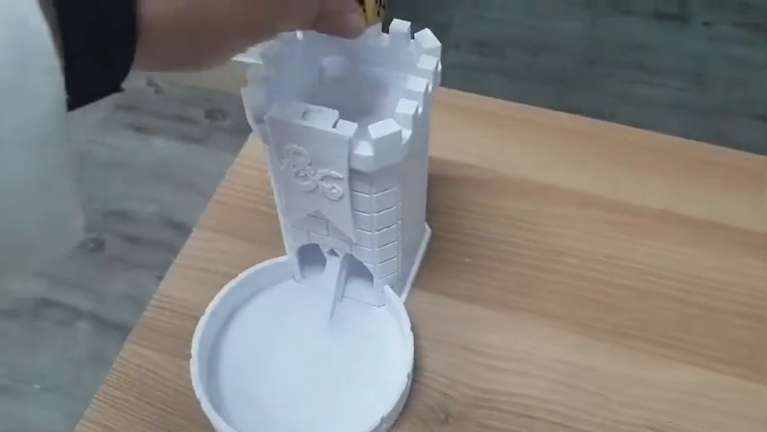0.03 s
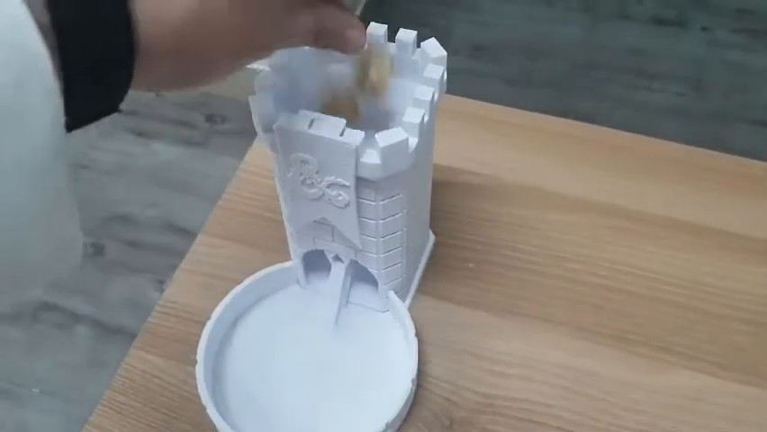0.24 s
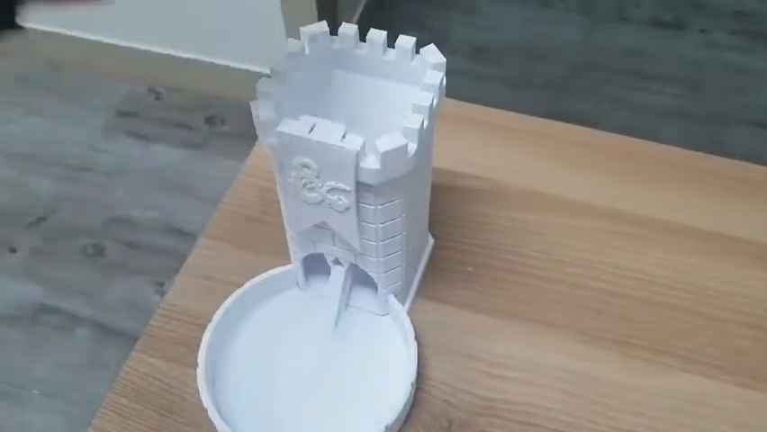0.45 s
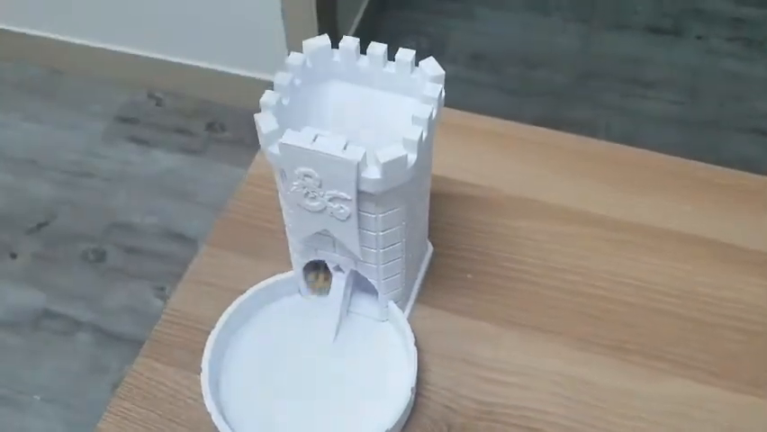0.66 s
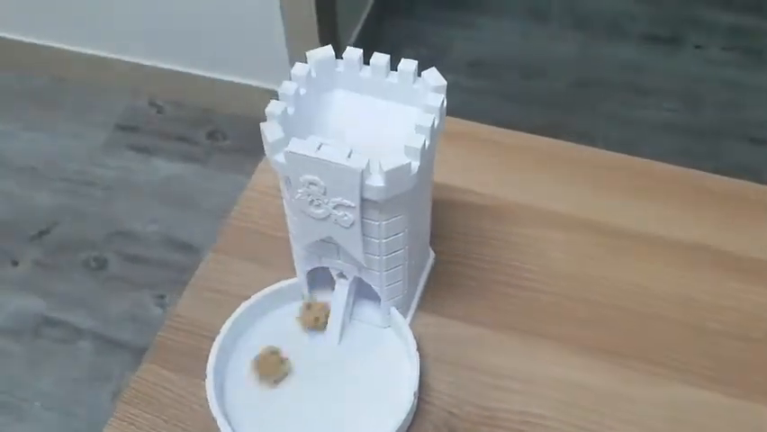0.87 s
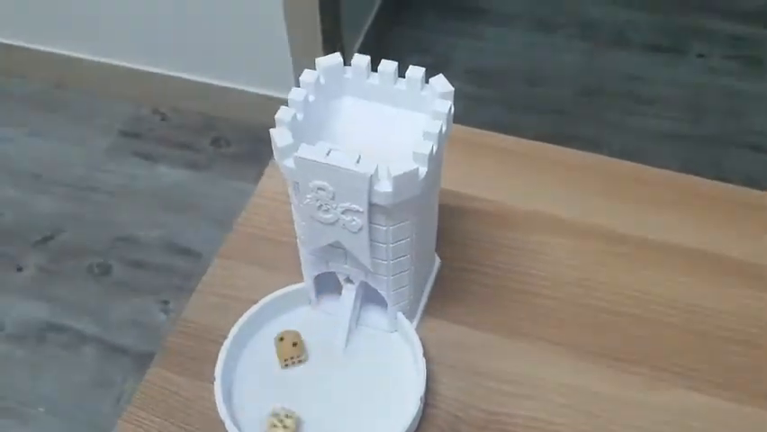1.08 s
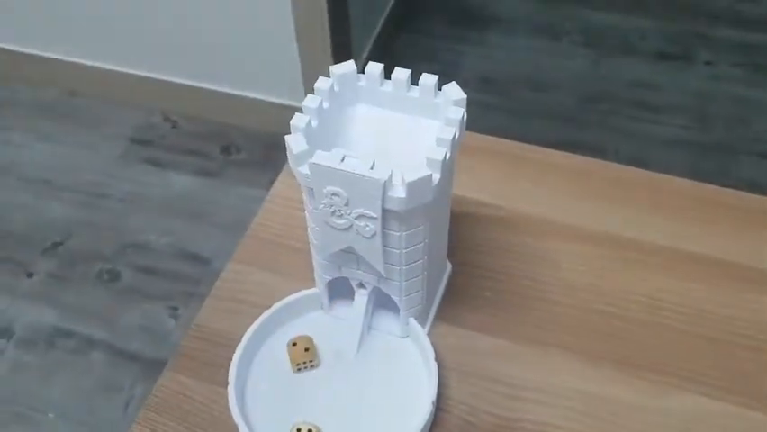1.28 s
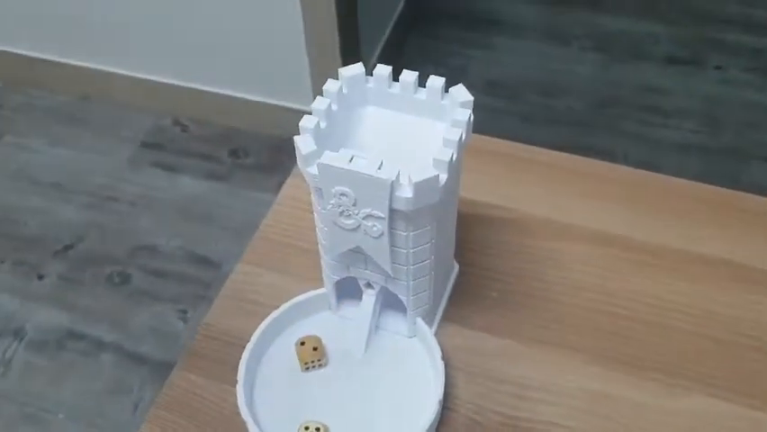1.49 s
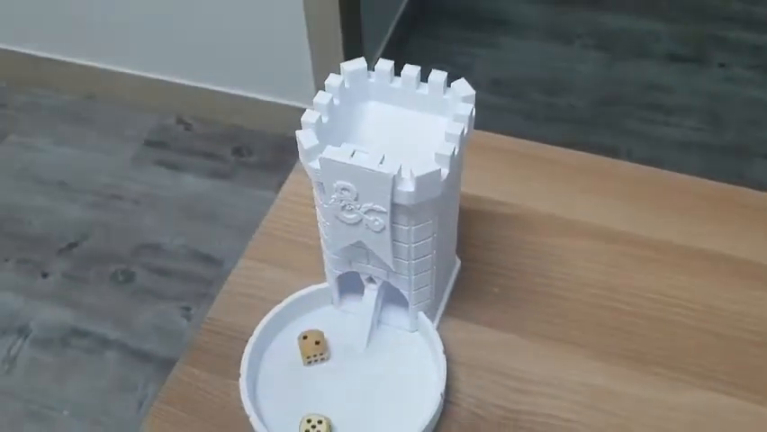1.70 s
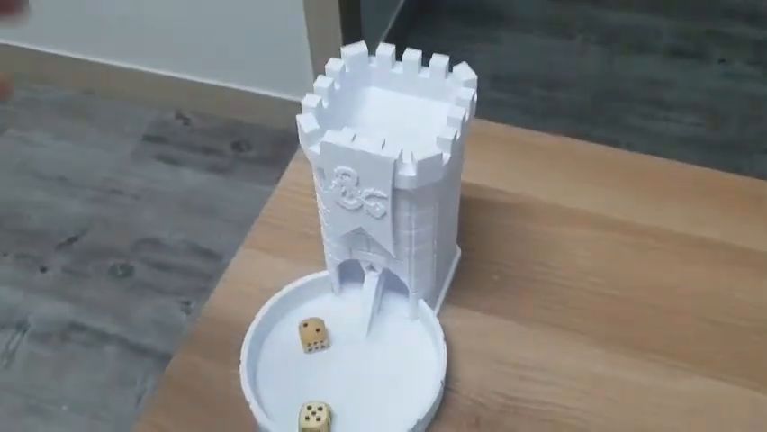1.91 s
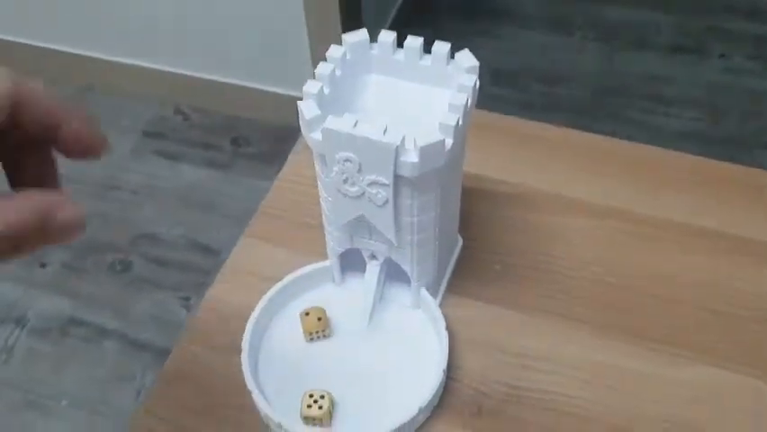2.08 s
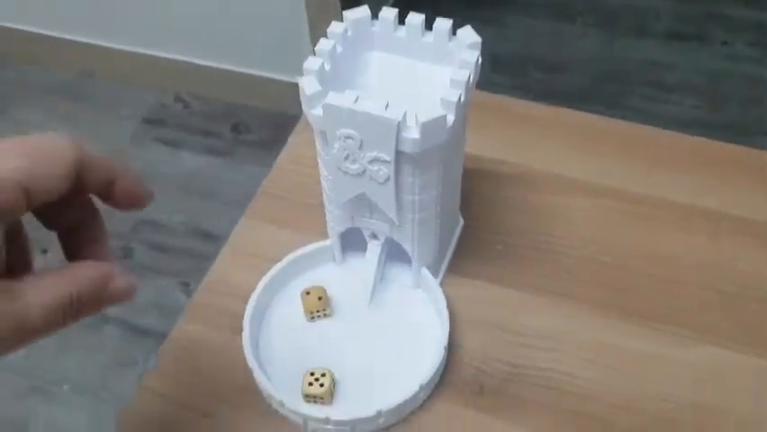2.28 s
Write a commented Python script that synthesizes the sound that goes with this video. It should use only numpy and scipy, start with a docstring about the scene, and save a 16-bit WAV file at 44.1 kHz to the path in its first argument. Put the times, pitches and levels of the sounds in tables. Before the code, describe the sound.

Two dice clatter down a plastic dice tower and click out onto its tray.

```python
"""A quiet room hums throughout. First two plastic dice tumble down the baffles of a plastic dice tower:
each impact cracks, excites the modes of the hollow shell and thumps the table. Then they skip out
onto the tray, which lies flat on the table and barely rings, so they only click. Last, a sleeve
rustles as a hand reaches for the dice."""
import sys
import numpy as np
from scipy import signal
from scipy.fft import rfft, irfft
from scipy.io import wavfile
from scipy.ndimage import uniform_filter1d

SR = 44100
rng = np.random.default_rng(int(sys.argv[2]) if len(sys.argv) > 2 else 0)


def unload_wav(signal):
    """Save mono or channel-first audio to the path in sys.argv[1] as 16-bit WAV at rate SR, clipped to [-1, 1]."""
    wavfile.write(
        sys.argv[1],
        SR,
        np.round(np.clip(np.atleast_2d(signal).T, -1, 1) * 32767).astype(np.int16),
    )


N = 108045

# Impacts in the tower. Each row: start in seconds, level in dB, pitch in Hz, then level offsets in dB
# for the wall mode, the edge, the tick and the hollow body.
KNOCKS = [(0.2339, -18.5, 4480, -19.5, 1, -16.5, -27), (0.2377, -20, 3190, -15, -8, -26, -27),
          (0.245, -25.5, 3190, -9.5, -2.5, -22, -22), (0.2507, -23, 3530, -18.5, -4, -16, -18),
          (0.2583, -16, 3760, -9.5, -4.5, -21, -42), (0.2619, -17, 3470, -9.5, -7, -26, -13.5),
          (0.2682, -23, 4740, -1, 1.5, -14, -12.5), (0.2722, -21, 2970, 0.5, -2.5, -22.5, -33),
          (0.2818, -25, 3070, 1, 3, -20, -11.5), (0.2933, -22, 2930, -2.5, 0.5, -28, -28),
          (0.2957, -18.5, 2830, -7.5, -18, -27, -30), (0.3189, -34.5, 4220, -11, 9.5, -4.5, -16),
          (0.3224, -22.5, 4300, -9.5, 0, -21, -21), (0.3289, -22, 3230, -1.5, -4, -22.5, -12),
          (0.3377, -38, 3270, -9, -3, -16, -10), (0.3616, -16.5, 3030, -4.5, 0.5, -13, -24.5),
          (0.3772, -25, 5240, 2, 5, -22.5, -24), (0.3815, -29.5, 3350, -8, -14, -24, -25),
          (0.3937, -25.5, 2950, -2, -10, -29, -21), (0.4147, -31, 3080, 10, 3, -29, -13),
          (0.4283, -43, 3200, 5.5, 6, -29, -14), (0.4593, -21.5, 3280, -12, -1.5, -19.5, -32),
          (0.4713, -22, 3350, 1.5, -2.5, -22, -37), (0.4809, -32, 3000, -29, -13.5, -8, -32),
          (0.4861, -25, 3250, -38, -3, -15, -11.5), (0.508, -23, 3280, -8.5, -6, -22, -30),
          (0.518, -21.5, 3490, -3, -5, -27, -16), (0.5225, -27, 3690, 7.5, 0, -18, -8),
          (0.5362, -24.5, 3790, -22, 2.5, -16, -18), (0.5461, -26, 2950, -5.5, -5, -22, -13.5),
          (0.5651, -25.5, 2530, -14, -6, -23, -9), (0.5713, -24, 4460, 1.5, -18, -32, -17),
          (0.5733, -22.5, 3280, -4, -1, -33, -36), (0.5982, -36, 4040, -3, 8.5, -17, -21),
          (0.6105, -34.5, 3570, -1.5, 6, -19, -20), (0.6278, -29, 4620, -2.5, -2.5, -21, -17),
          (0.6439, -29.5, 2720, -8, -3, -29, -18), (0.6503, -30.5, 3410, 0.5, -5.5, -21, -20),
          (0.6694, -30, 3730, 1, -9, -23.5, -18), (0.6893, -27.5, 4730, 3, -10, -21.5, -18),
          (0.6916, -44.5, 4300, 15.5, 4, -14, -28), (0.699, -29, 4560, -16, -4, -24, -21),
          (0.704, -42.5, 3530, 13, 2, -15, -4.5), (0.7105, -41, 3250, 3, 5, -15, -24),
          (0.7194, -34, 3170, -9, -1, -13.5, -33), (0.7414, -28.5, 4465, -10, 0.5, -18, -22),
          (0.7493, -37, 2900, -18, 2, -12, -6), (0.7602, -31.5, 3240, 3, -4, -24, -20),
          (0.7632, -33, 2650, -1, -12, -29, -23), (0.7782, -36.5, 6070, -17, 4, -19.5, -21),
          (0.7806, -28, 4510, -13, 5, -17, -17.5), (0.7925, -38.5, 3300, -7, -4, -24, -12),
          (0.7985, -34, 3040, -2.5, -1, -29, -19), (0.824, -35, 3000, -1, -4, -17, -14)]
# Impacts on the tray. Each row: start in seconds, level in dB, edge offset in dB, tick offset in dB.
CLICKS = [(0.848, -26.5, -6, -40), (0.8739, -34.5, -17, -33), (0.8938, -37.5, -15, -42),
          (0.911, -30.5, -20, -50), (0.912, -27.5, -27, -30), (0.9181, -36, -14, -30),
          (0.921, -30.5, 4, -25), (0.9587, -39, 5.5, -10), (0.9586, -40, -1, -10), (0.9674, -36.5, -2, -30),
          (0.9714, -35.5, -21, -23), (1.0067, -28, -8, -27), (1.0405, -34.5, -29, -37),
          (1.051, -60, -5, -41), (1.0736, -35.5, 7.5, -15), (1.0755, -36.5, -4, -16),
          (1.1095, -40, -1, -20)]
# Normal modes of shell and tray. Each row: frequency in Hz, relative level in dB, T60 in seconds.
SHELL_MODES = [(815, -14, .06), (1226, -10.5, 0.075), (1249, -10.5, 0.094), (1608, -3.5, 0.079),
               (1880, -4, .08), (1833, -3, 0.13), (2095, -0.5, 0.098), (2200, 0, .1), (2623, -1.5, 0.11),
               (2844, -3.5, 0.21), (3095, -8, .1), (3310, -5, .09), (3500, 2.5, 0.049), (4170, -7.5, 0.13)]
TRAY_MODES = [(201, -27, .12), (380, -22.5, 0.051), (826, -27, 0.042), (1115, -26.5, 0.16),
              (1525, -19, 0.057), (2170, -16.5, 0.066), (2540, -22, 0.033), (3050, -20, 0.047),
              (3280, -25, .035)]
# Movements of the sleeve. Each row: start in seconds, length in seconds, level in dB.
RUSTLES = [(1.618, .15, -49.5), (1.727, 0.099, -47.5), (2.068, 0.17, -54.5)]
# Noise spectra of cloth and room air. Each row: frequency in Hz, relative spectral level in dB.
CLOTH_SPECTRUM = [(300, -12), (1200, -5), (1700, -2.5), (2400, 0.5), (3000, -4), (3500, 1.5), (4200, -4.5),
                  (6000, -14.5), (9000, -26), (16000, -36)]
AIR_SPECTRUM = [(15, -35.5), (25, -9), (127, -4.5), (161, -8), (195, 0), (270, -5), (354, 0), (427, -8.5),
                (476, -4.5), (575, -14), (624, -8.5), (887, -14.5), (962, -9), (1650, -24), (2550, -23),
                (4610, -14.5), (6560, -29), (13600, -33), (16000, -41)]
# Narrow resonances in those spectra. Each row: centre in Hz, width in Hz, boost in dB.
CLOTH_PEAKS = [(927, 86, 15.2), (2410, 55, 13.6), (3386, 45, 9.7), (4230, 60, 17.4)]
AIR_PEAKS = [(602, 25, 7), (2370, 97, 7.5), (4700, 90, 8.5), (5450, 40, 11)]
# Coherence of the room air. Each row: frequency in Hz, left-right correlation.
AIR_COHERENCE = [(60, 0.96), (150, 0.92), (380, 0.9), (950, -0.0011), (2380, -0.11), (5980, 0.037),
                 (15000, -0.02)]
# Slow drift of the air's rumble and hiss. Each row: time in seconds, gain in dB.
RUMBLE_DRIFT = [(0, 1.5), (.2, 3.5), (1.0, -1), (1.3, -1.5), (1.55, -2.5), (1.75, 3), (1.95, -1),
                (2.24, 4.5), (2.35, 0.5), (2.45, 4)]
HISS_DRIFT = [(0, 2), (.2, 5), (1.2, -4), (1.55, -1.5), (1.9, 1.5), (2.45, 3.5)]
# Bands of the reverberant tail. Each row: lower edge in Hz, upper edge in Hz, T60 in seconds.
REVERB_BANDS = [(60, 760, 1), (700, 2040, 0.35), (2500, 7000, 0.29), (7070, 19700, 0.28)]
# Frequency responses of the reflections and the microphones. Each row: frequency in Hz, gain in dB.
ROOM_RESPONSE = [(150, -15.5), (1000, 7), (2000, 3), (4000, 2), (7000, 11.5), (14000, 4.5)]
MIC_RESPONSE = [(100, -4.5), (1100, 3), (2000, 2), (2400, 1.5), (2900, 0), (4500, 0), (6000, -5), (7300, 2),
                (8200, -6.5), (9500, -3), (16000, -4)]
# Stereo balance of the dice. Each row: frequency in Hz, left minus right in dB.
BALANCE = [(100, 0), (1300, -1), (2400, 0), (4400, -4.5), (8000, -.5), (15000, -1)]

CLACK_HZ, EDGE_HZ, TICK_HZ = (2605, 4078), (4030, 5990), (9000, 13700)
WALL_HZ, BODY_HZ, THUMP_HZ = 1869, (396, 1100), (107, 180)
RISE_S = .0011  # time constant of a vibration's onset


def tower():
    """Impact excitation: dice strike baffles and walls, ringing the shell and thumping the table."""
    out = np.zeros((2, N))
    for start, db, hz, wall_db, edge_db, tick_db, body_db in KNOCKS:
        ping = amp(-1.5) * damped_mode(hz, rise_s=RISE_S, lag_rad=.27)
        clack = amp(-2) * burst(CLACK_HZ, t60=.022, coherence=.76)
        edge = amp(edge_db - 1) * burst(EDGE_HZ, t60=.017, coherence=.71, order=2)
        tick = amp(tick_db + 1) * burst(TICK_HZ, t60=.018, coherence=.1)
        wall = amp(wall_db - 1.5) * damped_mode(WALL_HZ, rise_s=.0021, lag_rad=-.1)
        shell = amp(-8.5) * unit_rms(modal_ring(SHELL_MODES, spot_db=1, detune=.0037), samples=265)
        body = amp(body_db - 5) * burst(BODY_HZ, t60=.035, coherence=.49, order=2)
        thump = amp(-25) * burst(THUMP_HZ, t60=.1, coherence=1, rise_s=.005, order=2, samples=1300)
        for part in (ping, clack, edge, tick, wall, shell, body, thump):
            add(out, start, amp(db) * part)
    return delay_right(out, delay_s=.00006)


def tray():
    """Damping: the tray lies flat on the table, so skipping dice click and its modes barely ring."""
    out = np.zeros((2, N))
    for start, db, edge_db, tick_db in CLICKS:
        corner = amp(2.85) * snap(3510, contact_s=.00016)
        edge = amp(edge_db + 1.5) * snap(4800, contact_s=.00011)
        tick = burst(TICK_HZ, t60=.0076, coherence=.18, rise_s=.00023, order=1, samples=88)
        ring = modal_ring(TRAY_MODES, spot_db=2.5, detune=.008)
        for part in (corner, edge, amp(tick_db - 1) * tick, ring):
            add(out, start, amp(db) * part)
    return delay_right(out, delay_s=.00009)


def damped_mode(hz, rise_s, lag_rad, t60=.024):
    """Damped oscillation: one mode decays exponentially, slightly out of phase between the channels."""
    t = np.arange(SR // 8) / SR
    phase = 2 * np.pi * hz * t - np.array([[0], [1]]) * lag_rad
    onset = 1 - np.exp(-(t / rise_s) ** 2)
    return unit_rms(np.sin(phase) * onset * decay(t, t60), samples=265)


def burst(band_hz, t60, coherence, rise_s=RISE_S, order=3, samples=265):
    """Modal overlap: dense, quickly dying vibration behaves as a band of decaying noise."""
    t = np.arange(SR // 6) / SR
    noise = correlate(rng.standard_normal((2, len(t))), coherence)
    onset = 1 - np.exp(-t / rise_s)
    return unit_rms(bandpass(noise * onset * decay(t, t60), band_hz, order), samples)


def modal_ring(modes, spot_db, detune, spread_rad=.24):
    """Modal superposition: the spot struck, drawn at random, sets how strongly each mode answers."""
    t = np.arange(SR // 4) / SR
    hz, db, t60 = np.transpose(modes)[:, :, None]
    spot, shift, skew = rng.standard_normal((3, len(modes), 1))
    phase = 2 * np.pi * (hz * (1 + detune * shift) * t + rng.random((len(modes), 1)))
    envelope = amp(db + spot_db * spot) * decay(t, t60)
    channels = [(envelope * np.sin(phase + side * spread_rad * skew)).sum(0) for side in (-1, 1)]
    return np.array(channels) * (1 - np.exp(-t / RISE_S))


def snap(hz, contact_s):
    """Brief contact: one hard corner of a die radiates a pulse of only a few cycles."""
    t = np.arange(SR // 50) / SR
    pulse = np.sin(2 * np.pi * hz * t) * (t / contact_s) ** 2 * np.exp(-t / contact_s)
    return unit_rms(np.array([pulse, pulse]), samples=88)


def sleeve(grain_db=1.5):
    """Friction noise: cloth slides in soft, grainy swells."""
    t = np.arange(N) / SR
    swell = sum(amp(db) * np.sin(np.pi * np.clip((t - start) / length, 0, 1))
                for start, length, db in RUSTLES)
    grain = amp(grain_db * unit_rms(uniform_filter1d(rng.standard_normal(N), size=120)))
    friction = equalise(grain * rng.standard_normal((2, N)), CLOTH_SPECTRUM)
    return swell * unit_rms(resonate(friction, CLOTH_PEAKS))


def room(direct, tail_db, early_db=-13.5):
    """Reverberation: early reflections from table and walls, then a diffuse tail, follow the sound."""
    t = np.arange(SR // 2) / SR
    shape = (2, len(t))
    late = rng.standard_normal(shape) * (rng.random(shape) < .1) * (t > .005)
    early = rng.standard_normal(shape) * (rng.random(shape) < .06) * (t > .001)
    tail = sum(bandpass(late, (low, high), order=2) * decay(t, t60) for low, high, t60 in REVERB_BANDS)
    response = amp(tail_db) * unit_rms(tail) + amp(early_db) * unit_rms(early * decay(t, t60=.04))
    reflected = signal.fftconvolve(direct, response / np.sqrt(len(t)), axes=1)[:, :N]
    return direct + equalise(reflected, ROOM_RESPONSE)


def air(base_db=-51.5, split_hz=1100):
    """Ambient noise: the room's low rumble and faint hiss, each drifting in level."""
    hz, t = np.fft.rfftfreq(N, 1 / SR), np.arange(N) / SR
    spectrum = correlate(rfft(rng.standard_normal((2, N))), curve_at(AIR_COHERENCE, hz))
    noise = amp(base_db) * unit_rms(irfft(spectrum * amp(curve_at(AIR_SPECTRUM, hz)), N))
    noise = resonate(noise, AIR_PEAKS)
    rumble = irfft(rfft(noise) / (1 + (hz / split_hz) ** 4), N)
    rumble_gain = amp(np.interp(t, *np.transpose(RUMBLE_DRIFT)))
    hiss_gain = amp(np.interp(t, *np.transpose(HISS_DRIFT)))
    return rumble * rumble_gain + (noise - rumble) * hiss_gain


def amp(db):
    """The decibel scale: 20 dB is a factor of ten in amplitude."""
    return 10 ** (np.asarray(db) / 20)


def decay(t, t60):
    """Exponential decay: the level falls 60 dB in t60 seconds."""
    return np.exp(-np.log(1000) * t / t60)


def unit_rms(x, samples=None):
    """Normalisation: the first samples (or all) are brought to an rms of 1."""
    return x / np.sqrt(np.mean(x[..., :samples] ** 2) + 1e-20)


def add(mix, start, sound):
    """Superposition: a stereo sound joins the mix at a start time in seconds."""
    part = mix[:, round(start * SR):][:, :sound.shape[1]]
    part += sound[:, :part.shape[1]]


def correlate(noises, coherence):
    """Partial coherence: the right channel takes a share of the left channel's noise."""
    left, independent = noises
    return np.array([left, coherence * left + np.sqrt(1 - coherence ** 2) * independent])


def delay_right(x, delay_s):
    """Arrival-time difference: the sound reaches the right microphone slightly later."""
    phase_shift = np.exp(-2j * np.pi * np.fft.rfftfreq(N, 1 / SR) * delay_s)
    return np.array([x[0], irfft(rfft(x[1]) * phase_shift, N)])


def curve_at(points, hz):
    """Interpolation of a curve on a log-frequency axis."""
    frequencies, values = np.transpose(points)
    return np.interp(np.log(hz + 1), np.log(frequencies + 1), values)


def bandpass(x, band_hz, order):
    """Band limiting: frequencies outside the band are attenuated."""
    return signal.sosfilt(signal.butter(order, band_hz, "band", fs=SR, output="sos"), x)


def equalise(x, curve_db, share=1):
    """Linear filtering: the spectrum is weighted by a share of a curve in dB."""
    gain = amp(share * curve_at(curve_db, np.fft.rfftfreq(2 * N, 1 / SR)))
    return irfft(rfft(x, 2 * N) * gain)[..., :N]


def resonate(x, peaks):
    """Resonance: narrow bell-shaped peaks lift the spectrum."""
    hz = np.fft.rfftfreq(N, 1 / SR)
    boost_db = sum(db / (1 + (2 * (hz - centre) / width) ** 2) for centre, width, db in peaks)
    return irfft(rfft(x) * amp(boost_db), N)


def scene():
    """Superposition of dice, air and sleeve; a level difference sets the dice's treble to the right."""
    dice = room(tower(), tail_db=-12) + room(tray(), tail_db=-11)
    dice = equalise(dice, MIC_RESPONSE)
    dice = equalise(dice, BALANCE, share=np.array([[.5], [-.5]]))
    return dice + air() + room(sleeve(), tail_db=-7)


def record(dry, ceiling=.77, cutoff_hz=16000):
    """Soft saturation rounds off the highest peaks, and a low-pass filter limits the band."""
    rounded = dry / (1 + (dry / ceiling) ** 8) ** (1 / 8)
    lowpass = signal.firwin(255, cutoff_hz, window=("kaiser", 9), fs=SR)
    return signal.oaconvolve(rounded, lowpass[None], "same", axes=1)


dry = scene()
out = record(dry)
unload_wav(out)
```